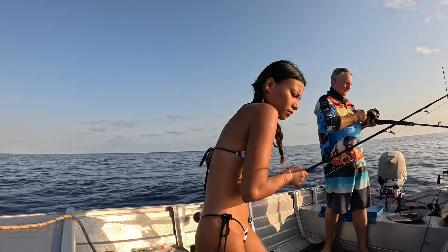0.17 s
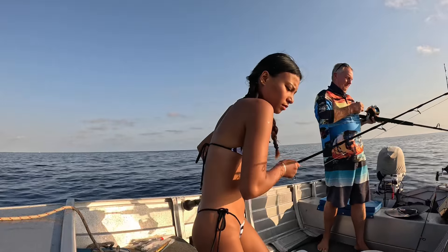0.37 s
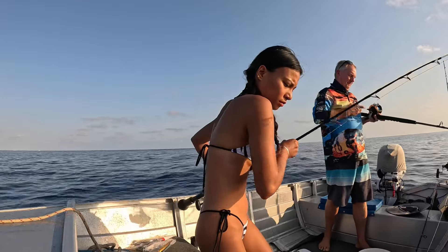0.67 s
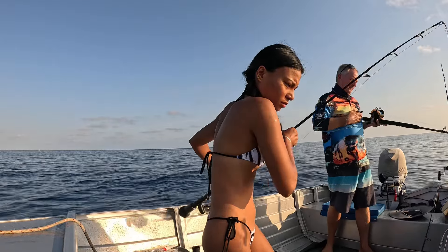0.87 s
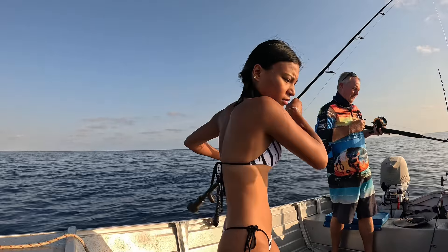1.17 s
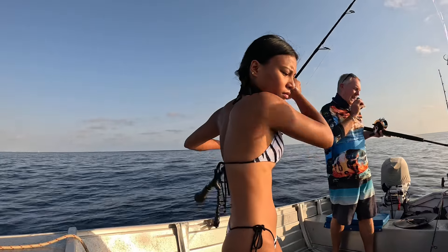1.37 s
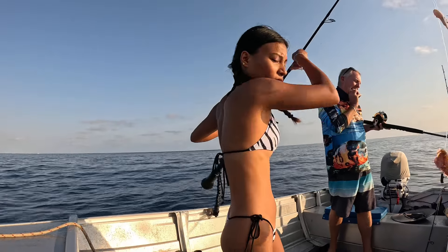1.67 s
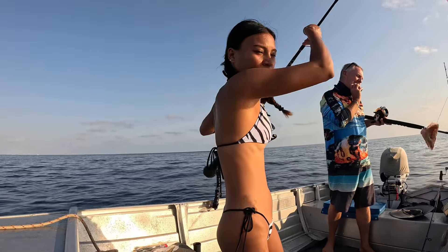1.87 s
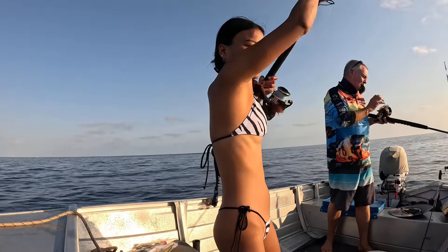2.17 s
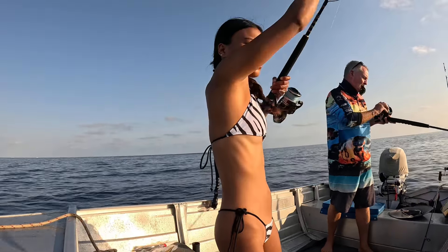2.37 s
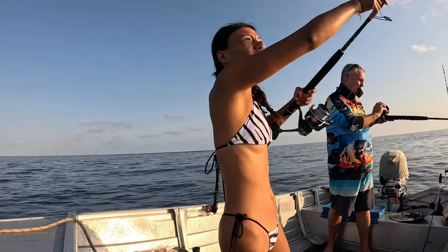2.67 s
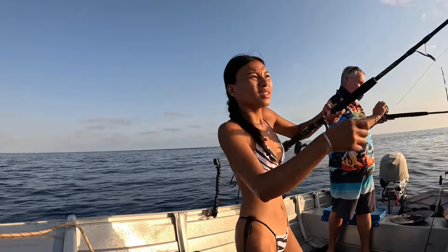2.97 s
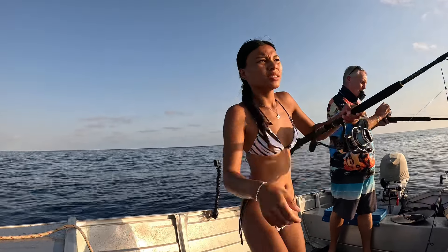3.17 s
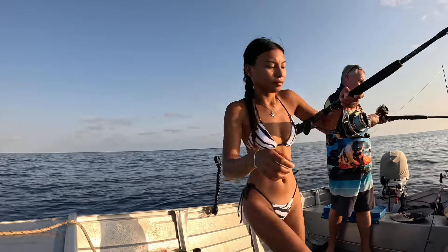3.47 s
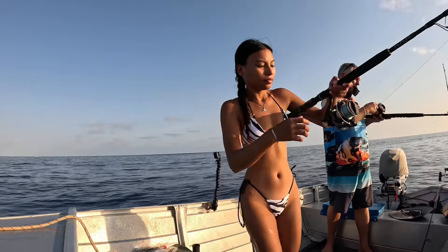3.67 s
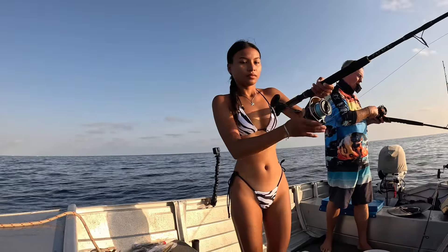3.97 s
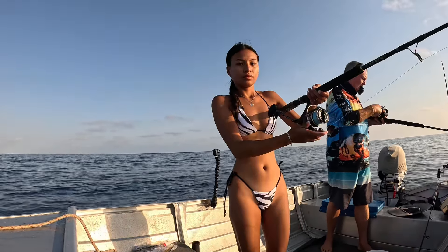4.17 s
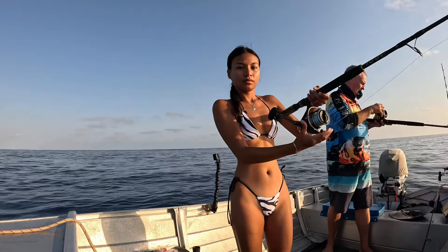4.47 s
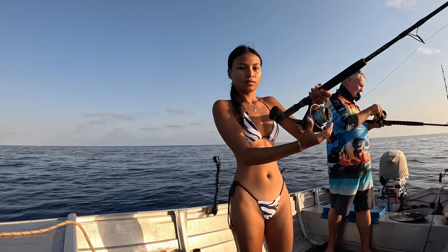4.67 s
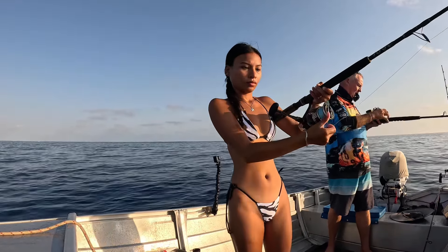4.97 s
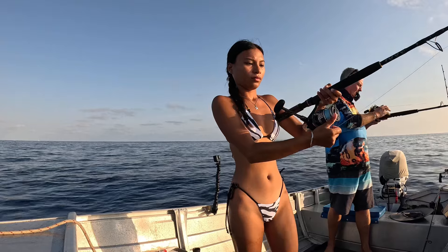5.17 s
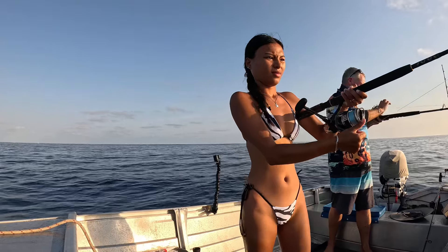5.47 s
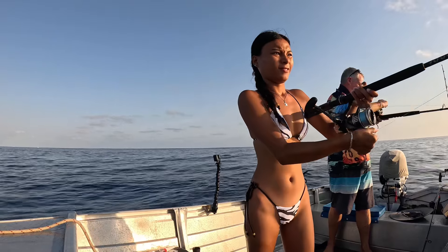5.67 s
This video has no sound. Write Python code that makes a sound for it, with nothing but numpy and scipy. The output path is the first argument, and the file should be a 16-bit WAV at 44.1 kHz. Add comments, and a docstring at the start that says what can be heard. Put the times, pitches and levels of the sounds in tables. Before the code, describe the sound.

Water smacks and gulps beneath thin metal plates, with light rod taps and rubbing gear. A heavy double blow just before one second dominates, its rattle dying quickly. Sparse laps and quiet tackle contacts lead to another big slap, a ratcheting reel turn and dull deck thuds. More waves and a bright clatter with a firm thud end it. Outdoor, dry, close stereo pickup with uneven wind rumble.

```python
"""Waves slap and gurgle under a small metal boat while a fishing rod and reel are handled close by.
Water is filtered noise and gliding pings that ring the side panels and hull modes.
One heavy knock and its rebound excite the hull plates, a crash of dense pings and rattling loose gear.
The reel ticks (noise bursts) and clicks (damped modes), tackle clacks, light parts tap, line swishes and dull
thuds push the deck. Low rumble of varying level: wind at the microphone, with a rise under the heavy knock."""
import sys
import numpy as np
from scipy import signal
from scipy.io import wavfile
from scipy.ndimage import uniform_filter1d, minimum_filter1d

SR = 44100
rng = np.random.default_rng(int(sys.argv[2]) if len(sys.argv) > 2 else 0)


def unload_audio(sound):
    """Save the sound as a 16-bit wav file, at the path given as the first command line argument."""
    columns = np.transpose(np.atleast_2d(sound))
    # keep every value between -1 and 1, then stretch to whole-number steps
    steps = np.round(np.clip(columns, -1, 1) * 32767)
    wavfile.write(sys.argv[1], SR, steps.astype(np.int16))


N = 256662
TIME = np.arange(N) / SR
RING = np.arange(26000) / SR  # time axis of one struck sound [s]
EDGE_HZ = 15500  # upper band limit
BOOM_DB, BOOM_GROWTH = -27, 0.38  # hull boom under a 0 dB slap; dB of boom per dB of slap

# waves on the hull: (time [s], slap level [dB], spray level [dB], brightness [factor on colour frequencies])
WAVES = [(0.001, -31.5, -57, 0.64), (0.108, -24.5, -54, 0.93), (0.15, -26.5, -65.5, 0.855),
         (0.31, -19, -49.5, 0.992), (0.384, -17.5, -43, .9), (0.429, -19, -37, 0.96),
         (0.507, -21.5, -62, 1.01), (1.172, -30, -44.5, 0.87), (1.45, -40, -55, 1.23),
         (1.707, -34, -54.5, 1.37), (1.737, -29.5, -57.5, 1.08), (1.792, -28, -44.5, 0.913),
         (1.834, -33, -47, 0.73), (1.882, -28.5, -45.5, 0.79), (2.469, -42.5, -50, 1.2),
         (3.266, -41.5, -61, 0.54), (3.639, -16.5, -33, 0.804), (4.527, -28.5, -49, .75),
         (4.558, -24.5, -36.5, 0.795), (4.602, -29.5, -41, 0.71), (5.287, -30, -41, 1),
         (5.317, -24, -34.5, 1.05), (5.362, -21.5, -33, 0.87)]
# heavy blows on the hull: (time [s], boom level [dB], crash level [dB])
KNOCKS = [(.913, 0, -1), (.936, -6.5, -11.5)]
# hull plate modes: (frequency [Hz], level [dB], t60 [s])
HULL_MODES = [(108.26, -10.5, 0.69), (146.8, -4.5, 0.4), (195.3, -8, 0.74), (221.6, -3.5, 0.26),
              (251.4, -13.5, 0.35), (305.73, -10, 0.3), (360, -10.5, 0.087), (506.6, -23.5, .35)]
# loose gear modes: (frequency [Hz], level [dB], t60 [s])
LOOSE_GEAR_MODES = [(1933, -6.5, 0.013), (2736, 1, 0.025), (3000, 3.5, 0.024), (3887, -1, 0.023)]
# spectrum of rubbing gear and line: (frequency [Hz], level [dB])
RATTLE_COLOUR = [(500, 2.5), (2400, -5), (3300, -5.5), (5500, -9.5), (8500, -17.5)]
# spectrum of hard metal contact: (frequency [Hz], level [dB])
CLACK_COLOUR = [(200, 11.5), (900, 8.5), (2000, -2.5), (3800, 4), (5500, -3.5), (8000, -8.5),
                (12000, -12.5), (15500, -39)]


def amp(db):
    """Decibels to gain."""
    return 10 ** (np.asarray(db) / 20)


def evened(x):
    """Scales to an rms of one."""
    return x / np.sqrt(np.mean(x ** 2) + 1e-20)


def peaked(x):
    """Scales to a peak of one."""
    return x / (abs(x).max() + 1e-20)


def punch(x, size=900):
    """Scales so that the loudest 20 ms have an rms of one."""
    return x / np.sqrt(uniform_filter1d(x ** 2, size).max() + 1e-20)


def add(mix, s, sound):
    """Mixes a sound in at time s."""
    part = mix[max(round(s * SR), 0):][:len(sound)]
    part += sound[:len(part)]


def colour(x, points, size=8192):
    """Causal minimum-phase filter with the given spectrum, falling steeply above its last point."""
    hz, db = np.transpose(points)
    bins = abs(np.fft.fftfreq(size, 1 / SR)) + 1
    roll_off = 20 * np.log2(np.maximum(bins / hz[-1], 1))  # 20 dB an octave
    gain_db = np.interp(np.log(bins), np.log(hz), db) - roll_off
    log_gain = np.log(amp(np.maximum(gain_db, -110)))
    impulse = np.fft.ifft(np.exp(np.conj(signal.hilbert(log_gain)))).real[:size // 2]
    window = np.cos(np.linspace(0, np.pi / 2, size // 2))
    return signal.fftconvolve(x, impulse * window)[:len(x)]


def noise(size=len(RING)):
    """White Gaussian noise."""
    return rng.standard_normal(size)


def fade(t60):
    """Exponential decay by 60 dB in t60 seconds, 2 ms at least."""
    return np.exp(-np.log(1000) * RING / max(t60, .002))


def ring(modes, vary_db=0):
    """Struck damped modes of alternating sign; their mix varies with the spot that is hit."""
    spot = vary_db * noise(len(modes))
    out = 0
    for k, (hz, db, t60) in enumerate(modes):
        sine = np.sin((2 * np.pi * hz * RING).astype(np.float32))
        out = out + (-1) ** k * amp(db + spot[k]) * sine * fade(t60)
    return out


def burst(t60, tail_db, tail_t60):
    """Dense tiny contacts: a quick blow plus a weaker, slower tail."""
    return noise() * (fade(t60) + amp(tail_db) * fade(tail_t60))


def clumps(per_s, depth_db, size=N):
    """Random swelling and sinking gain of unit rms."""
    knots = np.arange(0, size / SR + 1, 1 / per_s)
    swing = np.clip(noise(len(knots)), -2, 2)
    return evened(amp(depth_db * np.interp(TIME[:size], knots, swing)))


def ping_cloud(top_hz, spread_s, t60, count, glide=0):
    """Random-pitch pings, each with its own upward glide; half start at once, half later and weaker."""
    hz = rng.uniform(top_hz / 10, top_hz, (count, 1))
    late = rng.exponential(1, (count, 1)) * (np.arange(count)[:, None] % 2)
    t = np.maximum(RING[:len(RING) // 3] - spread_s * late, 0)
    turns = hz * t * (1 + glide * rng.random((count, 1)) * t / t60)
    decay = np.exp((-np.log(1000) * t / t60 - late / 2).astype(np.float32))
    pings = np.sin((2 * np.pi * turns).astype(np.float32)) * decay
    cloud = rng.choice([-1., 1.], count) @ pings
    return punch(np.pad(cloud, (0, len(RING) - t.shape[1])))


def panels():
    """Thin side panels struck at a random spot: equal nominal modes, slightly varied."""
    panel_hz = [340, 427, 586, 703, 793, 910, 1090, 1215]  # mode frequencies [Hz]
    return ring([(hz, 0, 0.1) for hz in panel_hz], vary_db=1)  # t60 0.1 s


def slap_boom_db(slap_db):
    """Hull boom level grows more slowly than the slap."""
    return BOOM_DB + BOOM_GROWTH * slap_db


def slaps(slap_db=-11, spray_db=-2, plates_db=-4, panel_db=-17, churn_db=-8, rise_s=0.00014,
          rush_db=-13, rush_s=0.03, slap_t60_s=.18, dull_boom_db=9):
    """Waves smack and ring the panels, trap air pockets, boom in the hull and throw a little spray."""
    # spectra: (frequency [Hz], level [dB])
    slap_colour = [(150, -32), (420, 1.5), (1250, -4.5), (1800, -13.5), (3000, -28), (7000, -45)]
    boom_colour = [(40, -30), (100, -5.5), (175, 1), (300, -1), (550, -19.5)]
    spray_colour = [(700, -5), (2000, -4.5), (4500, -14.5), (9500, -25)]
    out = np.zeros(N)
    squeeze = 1 - np.exp(-RING / rise_s)  # trapped air cushions the blow
    rush_size = round(rush_s * SR)
    for s, slap, spray, bright in WAVES:
        churn = punch(noise() * fade(2.5 * slap_t60_s))
        air = ping_cloud(top_hz=2500 * bright, spread_s=0.018, t60=slap_t60_s, count=30, glide=0.1525)
        smack = punch(colour(air + amp(churn_db) * churn, np.array(slap_colour) * [bright, 1]))

        boom_db = slap_boom_db(slap) - dull_boom_db * np.log2(bright)  # dB per octave duller
        hollow = punch(colour(noise() * fade(0.44), boom_colour))
        body = hollow + amp(plates_db) * punch(ring(HULL_MODES, vary_db=6.5))

        bunches = clumps(per_s=160, depth_db=10.5, size=len(RING))
        patter = punch(bunches * burst(t60=0.098, tail_db=-27, tail_t60=0.7))
        droplets = ping_cloud(top_hz=8050, spread_s=0.028, t60=0.034, count=30)
        drops = punch(colour(patter + droplets, spray_colour))

        blow = amp(slap + slap_db) * smack + amp(slap + panel_db) * punch(panels())
        add(out, s, squeeze * (blow + amp(boom_db) * body + amp(spray + spray_db) * drops))

        # water rushes up the plates just before it closes on them
        rush = evened(colour(noise(rush_size), spray_colour)) * np.linspace(0, 1, rush_size)
        add(out, s - rush_s, amp(spray + rush_db) * rush)
    return out


def water(gurgle_db=-58, wake_db=-17, wake_s=0.06):
    """Lumpy gurgling noise whose power swells after each slap and the heavy knock."""
    gurgle_colour = [(50, -26), (190, 0.5), (320, -1), (550, -13), (1500, -26), (8000, -43)]  # (frequency [Hz], level [dB])
    stirred = np.zeros(N)  # power
    stirs = [(s, slap_boom_db(slap)) for s, slap, _, _ in WAVES] + [(KNOCKS[0][0], -20)]
    for s, db in stirs:
        add(stirred, s, amp(db + wake_db) ** 2 * np.exp(-TIME[:SR] / wake_s))
    lumps = evened(colour(noise(N) * clumps(per_s=50, depth_db=3.0), gurgle_colour))
    return lumps * np.sqrt(amp(gurgle_db) ** 2 + stirred)


def placed(x, pan_db):
    """Leans a sound to the left (+) or right (-)."""
    return np.array([x * amp(pan_db / 2), x * amp(-pan_db / 2)])


def low_rumble(rumble_db=-1, apart=0.38):
    """Low noise partly shared by the two ports: wind at the microphone, with a rise under the heavy knock."""
    rumble_level = [(0.0, -58), (0.84, -65), (0.89, -47.5), (2.01, -67), (2.56, -46.5), (3.22, -40.5),
                    (3.4, -48.5), (4.05, -37), (4.88, -52.5), (4.97, -38), (5.24, -57.5), (5.72, -37.5)]  # (time [s], level before rumble_db [dB])
    rumble_colour = [(8, -6.5), (30, -2.5), (70, -6), (200, -27)]  # (frequency [Hz], level [dB])
    shared, differing = (evened(colour(noise(N), rumble_colour)) for _ in range(2))
    gain = amp(rumble_db) * amp(np.interp(TIME, *np.transpose(rumble_level)))
    return gain * (placed(shared, pan_db=-1.5) + apart * np.array([differing, -differing]))


def rattle(per_s=260, slip=0.66, jitter=0.92, ring_db=-4, ring_growth=1.0):
    """Gear sticks and slips on metal: uneven tiny bursts in bunches; harder scrapes ring more."""
    # (start [s], end [s], start level [dB], end level [dB], brightness [factor on colour frequencies])
    scrapes = [(0.087, 0.233, -51.5, -50.5, 0.57), (0.374, 0.503, -44, -51, 0.62),
               (0.878, 0.924, -50.5, -29, 1.3), (0.999, 1.336, -40.5, -51, 0.78),
               (1.512, 1.625, -49, -57, 0.81), (2.661, 2.766, -53, -50.5, 0.689),
               (3.499, 3.634, -56, -43, 0.43), (3.659, 3.847, -47, -49, 1.15)]
    out = np.zeros(N)
    hardest_db = max(row[2] for row in scrapes)
    for start, end, first_db, last_db, bright in scrapes:
        n = max(round((end - start) * SR), 2)
        wander = evened(uniform_filter1d(noise(n), size=200))
        turns = np.cumsum(per_s * np.exp(jitter * wander)) / SR
        force = noise(n) * np.exp(-(turns % 1) / slip) * clumps(per_s=140, depth_db=4.5, size=n)
        scrape = evened(colour(force, np.array(RATTLE_COLOUR) * [bright, 1]))
        ringing = evened(signal.fftconvolve(force, ring(LOOSE_GEAR_MODES))[:n])
        slips = evened(scrape + amp(ring_db + ring_growth * (first_db - hardest_db)) * ringing)
        add(out, start, slips * amp(np.linspace(first_db, last_db, n)) * signal.windows.tukey(n, .3))
    return out


def gulps(rise=0.148, swell_s=0.00057, t60_at_1khz_s=0.053, t60_power=0.73):
    """Trapped air rings under the hull and rises in pitch as it nears the surface."""
    air_pockets = [(0.125, 399, -31), (0.388, 275, -22.5), (0.423, 1130, -24), (0.437, 436, -20.5),
                   (.508, 771, -27), (1.453, 731, -40), (1.738, 717, -31.5), (1.806, 746, -33),
                   (1.822, 246, -23), (1.891, 238, -29), (2.182, 1207, -42.5), (3.671, 760, -29),
                   (4.528, 363.3, -30), (4.577, 1116, -28), (4.589, 250.7, -25.5), (4.648, 253.5, -33.5),
                   (5.318, 1770, -29)]  # (time [s], starting pitch [Hz], level [dB])
    out = np.zeros(N)
    for s, hz, db in air_pockets:
        t60 = t60_at_1khz_s * (10 ** 3 / hz) ** t60_power
        turns = np.cumsum(hz * (1 + rise * (1 - fade(t60 * 2)))) / SR
        envelope = fade(t60) * (1 - np.exp(-RING / swell_s))
        add(out, s, amp(db) * peaked(np.sin(2 * np.pi * turns) * envelope))
    return out


def taps(overtone=1.3, overtone_db=-9, click_db=-11, size=4000, t60_cycles=64, contact_t60_s=0.028):
    """Chattering contact of rod, guides or line rings a damped part, its overtone and a soft click."""
    light_taps = [(.199, 1396, -32.5), (.486, 2421, -39), (0.552, 2380, -43.5), (1.726, 1460, -33.5),
                  (1.872, 1472, -39), (1.982, 1537, -49.5), (2.039, 3060, -57.5), (2.375, 5650, -59),
                  (3.245, 1200, -46), (3.566, 1310, -36.5), (3.59, 2029, -28), (3.685, 2280, -35),
                  (3.748, 1940, -34.5), (3.788, 2060, -43), (3.908, 3312, -38.5), (4.399, 7140, -55),
                  (4.683, 1550, -41.5), (4.783, 2770, -43.5), (5.668, 2580, -20.5)]  # (time [s], pitch [Hz], level [dB])
    out = np.zeros(N)
    for s, hz, db in light_taps:
        over_hz = hz * overtone
        contact = noise(size) * fade(contact_t60_s)[:size]
        part = ring([(hz, 0, t60_cycles / hz), (over_hz, overtone_db, t60_cycles / over_hz)])[:size]
        ringing = peaked(signal.fftconvolve(contact, part)[:size])
        band = signal.butter(2, [hz / 2, min(hz * 2, EDGE_HZ)], "bandpass", fs=SR)
        click = peaked(signal.lfilter(*band, contact))
        add(out, s, amp(db) * peaked(ringing + amp(click_db) * click))
    return out


def knocks(lowest_hz=70, panel_db=-20):
    """A heavy blow and its rebound: low plate modes, ringing panels and a crash of dense upper modes."""
    crash_colour = [(30, -17), (160, 11), (1200, -7), (2000, -14), (3000, -15.5), (9500, -32.5)]  # (frequency [Hz], level [dB])
    out, plates = np.zeros(N), peaked(ring(HULL_MODES))
    for s, boom_db, crash_db in KNOCKS:
        upper = ping_cloud(top_hz=3573, spread_s=0.013, t60=0.33, count=200)
        contacts = burst(t60=0.081, tail_db=-21.0, tail_t60=0.91)
        crash = peaked(colour(amp(-26.5) * upper + contacts, crash_colour))
        boom = plates + amp(panel_db) * peaked(panels())
        add(out, s, amp(boom_db) * boom + amp(crash_db) * crash)
    # the knocks keep little deep bass below lowest_hz
    return signal.sosfilt(signal.butter(2, lowest_hz, "highpass", fs=SR, output="sos"), out)


def jolts(crack_db=1):
    """Loose gear shaken by the knock lands again and again, each time with a brief ringing chatter."""
    landings = [(0.998, -26.5), (1.012, -25.5), (1.044, -34), (1.072, -26.5), (1.106, -31), (1.247, -37)]  # (time [s], level [dB])
    out = np.zeros(N)
    for s, db in landings:
        chatter = noise() * fade(.045)
        gear = ring(LOOSE_GEAR_MODES, vary_db=3)
        ringing = peaked(signal.fftconvolve(chatter, gear)[:len(RING)])
        crack = peaked(colour(chatter, CLACK_COLOUR))
        add(out, s, amp(db) * peaked(ringing + amp(crack_db) * crack))
    return out


def clacks(ring_lag_s=.004):
    """Hard tackle cracks and clinks, then rings roughly; clink and ring vary from spot to spot."""
    # (time [s], crack level [dB], crack t60 [s], ring level relative to crack [dB])
    contacts = [(1.369, -41.5, 0.038, -2), (2.798, -35.5, 0.038, -24), (3.135, -47, 0.051, -9),
                (3.487, -36, 0.0188, -20), (3.562, -35, 0.038, -17), (4.249, -47.5, 0.037, -23),
                (4.809, -42.5, 0.078, 4), (5.284, -19.5, 0.013, -10), (5.564, -23.5, 0.033, -16),
                (5.652, -18.5, 0.048, 3), (5.689, -28, 0.035, -6.5), (5.789, -29, 0.058, -27)]
    tackle_modes = [(1365, 12, 0.048), (2061, 10, 0.023), (2494, 11, 0.0288), (2740, 1, 0.079),
                    (3360, 4, 0.025)]  # (frequency [Hz], level [dB], t60 [s])
    out = np.zeros(N)
    for s, db, t60, ring_db in contacts:
        clink = ping_cloud(top_hz=9314, spread_s=0.0035, t60=t60, count=40)
        crack = punch(burst(t60, tail_db=-24.5, tail_t60=0.97))
        add(out, s, amp(db) * peaked(colour(crack + clink, CLACK_COLOUR)))
        metal = signal.fftconvolve(noise() * fade(0.015), ring(tackle_modes, vary_db=3.0))
        add(out, s + ring_lag_s, amp(db + ring_db) * peaked(metal))
    return out


def thuds(lead_s=.03):
    """A heel or other dull blow flexes the deck once, it springs back, and the hull hums on."""
    # (time [s], push level [dB], push width [s], hull boom level [dB])
    pushes = [(2.756, -37.5, 0.0013, -34.5), (4.146, -31.5, 0.0011, -60), (4.223, -25, 0.00572, -56.5),
              (4.386, -24, 0.00228, -38.5), (5.571, -12, 0.001768, -23)]
    out, plates = np.zeros(N), peaked(ring(HULL_MODES))
    for s, db, push_s, boom_db in pushes:
        u = (RING - lead_s) / push_s
        add(out, s - lead_s, amp(db) * (1 - u ** 2) * np.exp(-u ** 2 / 2))
        add(out, s, amp(boom_db) * plates)
    return out


def reel(snap_db=-1, brake_order=7, count=6):
    """Drag gives line in runs of bright ticks; the pawl rings the housing as the handle turns and stops."""
    # line pulled against the drag: (start [s], length [s], tick level [dB], nominal tick gap [s])
    pulls = [(2.815, .0192, -31, .0096), (2.9487, .0645, -35, .016)]
    pawl_modes = [(1460, -2.5, 0.117), (2810, 1, 0.031), (4660, 16, 0.014), (6374, 15, 0.018),
                  (7120, 15, 0.026)]  # (frequency [Hz], level [dB], t60 [s])
    # spectra: (frequency [Hz], level [dB])
    drag_colour = [(3400, -17.5), (4400, -1), (5000, 3.5), (6400, -9.5), (7200, -4.5), (8200, -21),
                   (15000, -35.5)]
    fizz_colour = [(1200, -9.5), (7500, 0), (14000, -22.5)]
    crank_start_s, pawl_gap_s, last_delay_s = 3.8356, .0405, .0209
    pawl_db, pawl_ends_db = -33, -5.5  # mid-turn level; change at both ends of the turn
    out = np.zeros(N)
    for s, length, db, gap in pulls:
        for delay in np.linspace(0, length, 1 + round(length / gap)):
            tick = peaked(colour(burst(t60=0.0019, tail_db=-9.5, tail_t60=0.073), drag_colour))
            add(out, s + delay, amp(db) * tick)
    for k, turn in enumerate(np.linspace(0, 1, count)):
        s = crank_start_s + k * pawl_gap_s + last_delay_s * turn ** brake_order
        snap = peaked(colour(burst(t60=0.0419, tail_db=-16.5, tail_t60=0.13), fizz_colour))
        click = peaked(ring(pawl_modes, vary_db=-2.5)) + amp(snap_db) * snap
        add(out, s, amp(pawl_db + pawl_ends_db * (2 * turn - 1) ** 2) * click)
    return out


def swish(start_s=3.22, length_s=0.3, swish_db=-62.0, bright=1.187):
    """Line slides off the spool: coloured noise in one smooth swell."""
    out, n = np.zeros(N), round(length_s * SR)
    hiss = evened(colour(noise(n), np.array(RATTLE_COLOUR) * [bright, 1]))
    add(out, start_s, amp(swish_db) * hiss * np.sin(np.linspace(0, np.pi, n)))
    return out


def scatter(x, t60, db):
    """Brief reflections off the boat's sides: decaying noise tails, different at each port."""
    tails = rng.standard_normal((2, len(RING))) * fade(t60) * (RING > .003)
    echoes = signal.fftconvolve(x[None], tails / np.linalg.norm(tails[0]), axes=1)[:, :N]
    return amp(db) * echoes


def scene():
    """Water centred, hull slightly left, rod and reel a little right, with reflections and low rumble."""
    sea = slaps() + gulps() + water()
    hull = knocks() + thuds()
    gear = clacks() + taps() + jolts() + reel() + rattle() + swish()
    direct = placed(sea, pan_db=0.0) + placed(hull, pan_db=0.33) + placed(gear, pan_db=-1.5)
    sea_echo = scatter(sea, t60=0.074, db=-13.5)
    hull_echo = scatter(hull, t60=0.027, db=-29.0)
    gear_echo = scatter(gear, t60=0.034, db=-9.5)
    return direct + sea_echo + hull_echo + gear_echo + low_rumble()


def record(dry, ceiling=0.66):
    """A fast limiter holds peaks down; a low-pass then limits the band."""
    allowed = ceiling / np.maximum(abs(dry).max(0), ceiling)
    limited = dry * uniform_filter1d(minimum_filter1d(allowed, size=400), size=300)
    low_pass = signal.firwin(511, EDGE_HZ, window=("kaiser", 9), fs=SR)
    return signal.oaconvolve(limited, low_pass[None], "same")


dry = scene()
out = record(dry)
unload_audio(out)
```